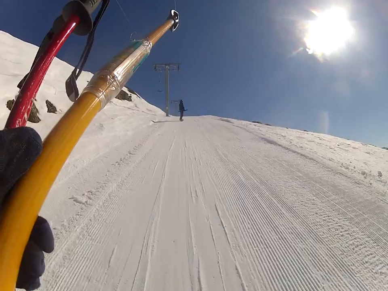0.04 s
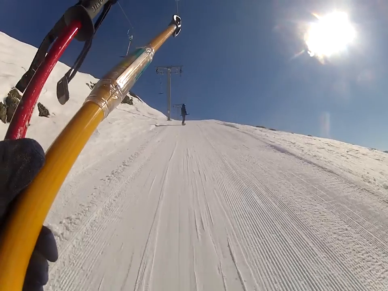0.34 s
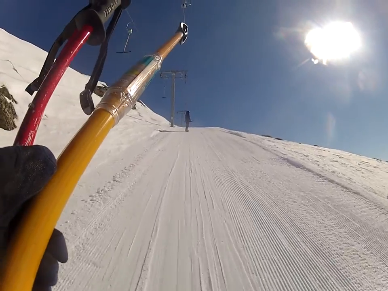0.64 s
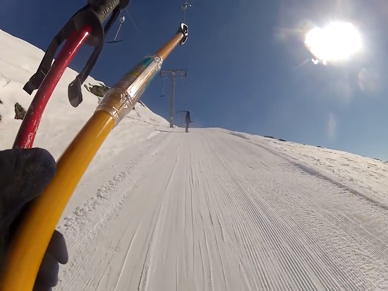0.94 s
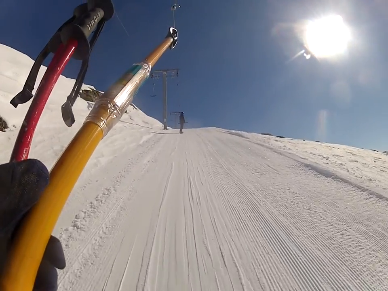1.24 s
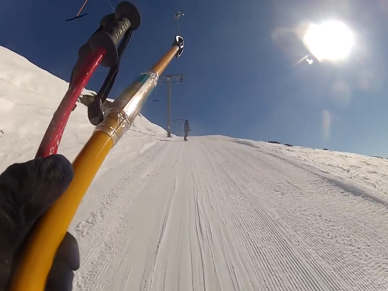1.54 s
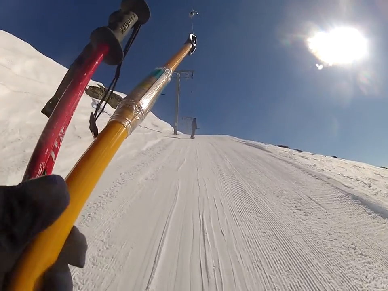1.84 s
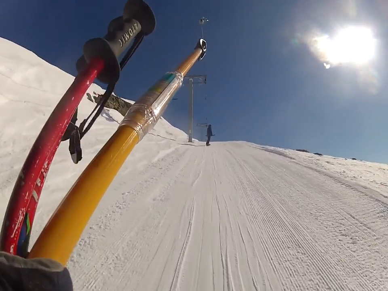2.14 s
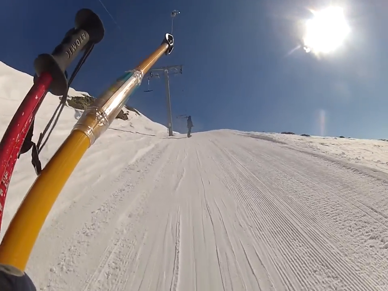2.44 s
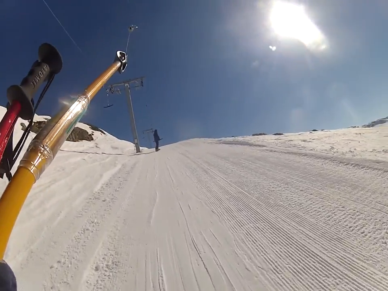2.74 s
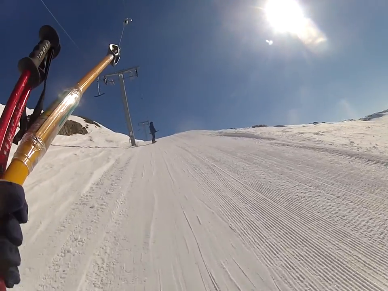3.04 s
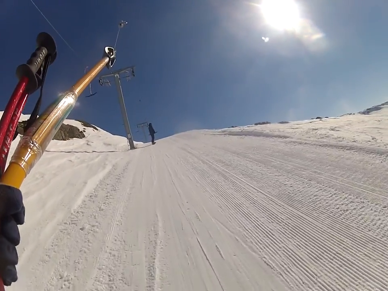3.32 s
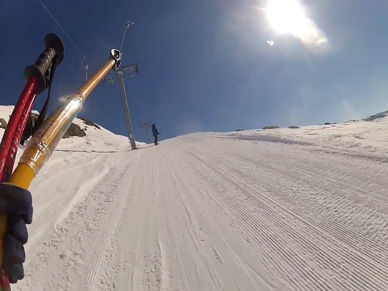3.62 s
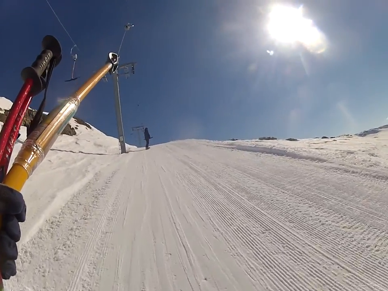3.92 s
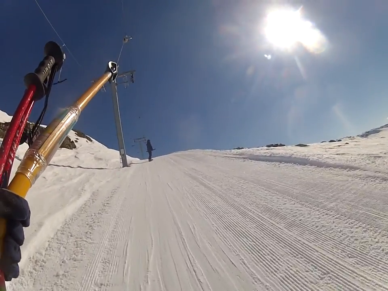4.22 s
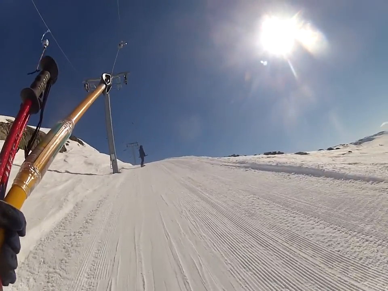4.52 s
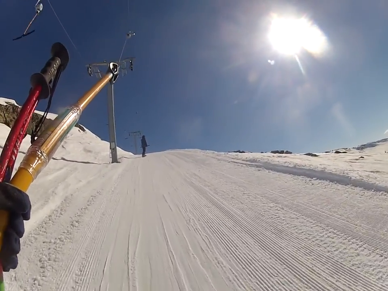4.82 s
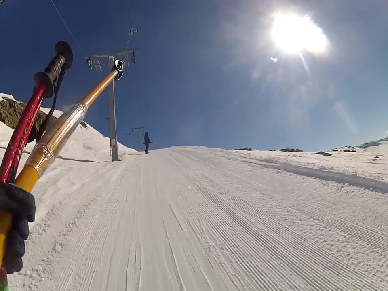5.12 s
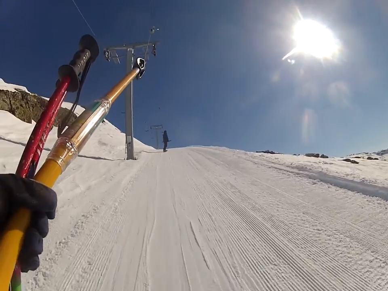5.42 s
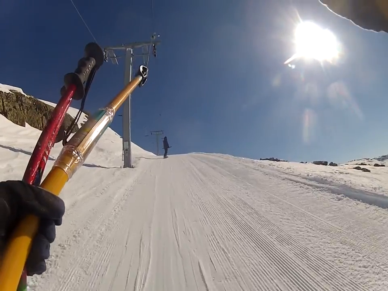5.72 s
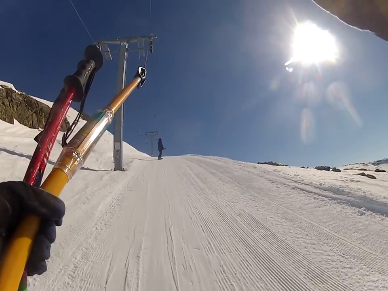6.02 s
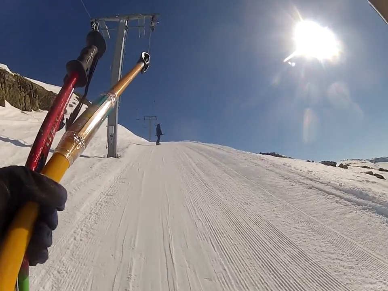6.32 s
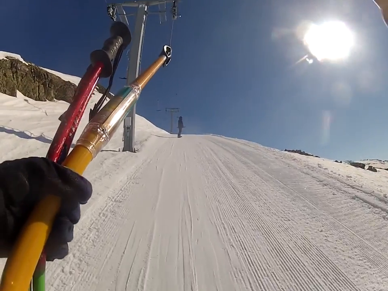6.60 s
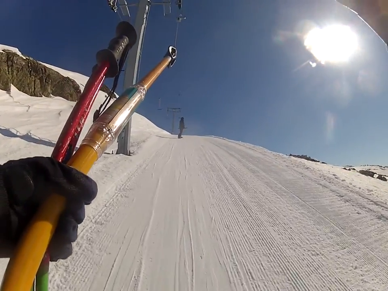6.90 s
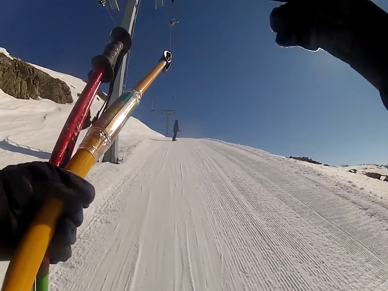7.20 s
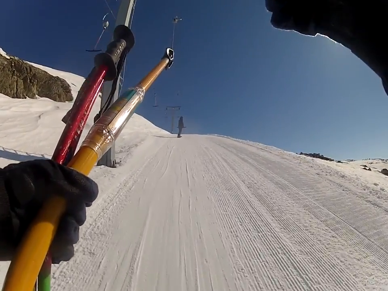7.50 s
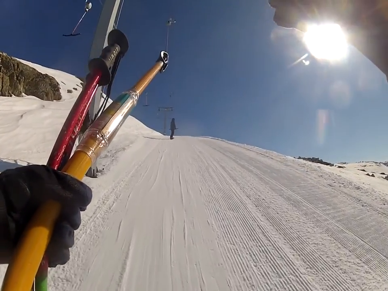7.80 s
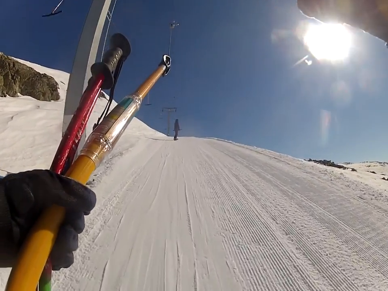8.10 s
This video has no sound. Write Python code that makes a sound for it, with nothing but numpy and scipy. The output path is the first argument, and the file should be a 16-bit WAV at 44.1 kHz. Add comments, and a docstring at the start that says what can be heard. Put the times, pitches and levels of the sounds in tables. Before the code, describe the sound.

Muffled, steady hiss of a board towed over snow, with rumbling wind and faint paired thumps, broken by a creak and a hard knock.

```python
"""A drag lift tows a snowboard up a groomed slope, heard from a camera in a closed case on the rider's
chest. All along, snow hisses under the board and rings in the case, and wind and ride rumble.
The mount creaks at once, then soft paired thuds like a heartbeat come through. From two seconds on,
a sleeve now and then scrapes the case. Just after five seconds the mount creaks and jolts, and something
hard knocks on the case once. The camera samples slowly and holds each sample, which adds a thin treble."""
import sys
import numpy as np
from scipy import signal
from scipy.fft import rfft, irfft, next_fast_len
from scipy.io import wavfile

SR = 44100
rng = np.random.default_rng(int(sys.argv[2]) if len(sys.argv) > 2 else 0)


def master(y):
    """Save y as 16-bit WAV."""
    cut = np.clip(np.atleast_2d(y).T, -1, 1)
    pcm = np.round(cut * 32767)  # scale
    wavfile.write(sys.argv[1], SR, pcm.astype(np.int16))


N = 359415
TIME = np.arange(N) / SR
HOLD_HZ = 8000  # samples the camera takes each second

# tone colour of a scrape or crack on the case: pitch_hz, level_db
CONTACT_SPECTRUM = [(300, -48), (600, -18), (900, -6.5), (1250, 0.5), (1550, 3.5), (1900, 6.5), (2300, 7),
                    (2750, -10.5), (3450, 5), (3900, -2)]


def from_db(db):
    """Turn decibels into a number to multiply by."""
    return 10 ** (np.asarray(db) / 20)


def rms_one(x):
    """Scale a sound so that its average strength (rms) is 1."""
    return x / np.sqrt(np.mean(x ** 2) + 1e-20)


def in_time(rows):
    """Join rows of (time_s, values...) with straight lines: one curve for each value column."""
    times, *columns = np.transpose(rows)
    return [np.interp(TIME, times, column) for column in columns]


def during(rows, fade_s=0.0036):
    """1 from the first row's time to the last, with a short fade to 0 on each side."""
    start, end = rows[0][0], rows[-1][0]
    return np.interp(TIME, [start - fade_s, start, end, end + fade_s], [0, 1, 1, 0])


def swells(rows):
    """Bell-shaped rises and falls from (middle_s, length_s, levels...): one gain curve for each level."""
    return sum(from_db(dbs)[:, None] * np.exp(-(2 * (TIME - middle) / length) ** 2)
               for middle, length, *dbs in rows)


def drift(rate_hz):
    """A smooth random wobble, about 1 in size; a higher rate wobbles faster."""
    step = 40  # samples between random points
    r = np.exp(-2 * np.pi * rate_hz * step / SR)
    slow = signal.lfilter([1], [1, -2 * r, r * r], rng.standard_normal(N // step + 2002))[2000:]
    return np.interp(np.arange(N) / step, np.arange(len(slow)), rms_one(slow))


def coloured(x, spectrum):
    """Give a sound a tone colour, with nothing above half the camera's sample rate; strength 1."""
    size = next_fast_len(N)
    hz, db = np.transpose(spectrum)
    bins_hz = np.maximum(np.fft.rfftfreq(size, 1 / SR), 1)
    gain = from_db(np.interp(np.log(bins_hz), np.log(hz), db)) * (bins_hz < HOLD_HZ / 2)
    return rms_one(irfft(rfft(x, size) * gain, size)[:N])


def resonate(x, modes):
    """Pick out a narrow band around each pitch and add them, every other one flipped; strength 1."""
    out = 0
    for k, (hz, width_hz, db) in enumerate(modes):
        r = np.exp(-np.pi * width_hz / SR)
        band = signal.lfilter([1, 0, -1], [1, -2 * r * np.cos(2 * np.pi * hz / SR), r * r], x)
        out = out + (-1) ** k * from_db(db) * (1 - r * r) / 2 * band
    return rms_one(out)


def ring(x, hz, fade_s):
    """Each click starts a pure tone that dies away by 60 dB in fade_s."""
    r = from_db(-60 / (fade_s * SR))
    angle = 2 * np.pi * hz / SR
    return signal.lfilter([0, np.sin(angle)], [1, -2 * r * np.cos(angle), r * r], x + 1e-18)


def clicks(rows):
    """One click for each (start_s, level_db)."""
    out = np.zeros(N)
    for start_s, db in rows:
        out[round(start_s * SR)] += from_db(db)
    return out


def grains(per_s, spread_db):
    """Tiny slips at random moments and of uneven size."""
    sizes = from_db(spread_db * np.minimum(rng.exponential(1, N), 4))
    return (rng.random(N) < per_s / SR) * sizes * rng.standard_normal(N)


def thuds(rows, hz, fade_s, soft_hz):
    """Soft pushes (clicks dulled above soft_hz) rock the camera on its mount."""
    push = signal.sosfilt(signal.butter(2, soft_hz, fs=SR, output="sos"), clicks(rows))
    return ring(push, hz, fade_s)


def board(hiss_gain, ring_gain, crunch_gain):
    """Snow crystals crush under the board, and the case rings along at its own pitches."""
    # tone colour of crushing snow: pitch_hz, level_db
    snow_spectrum = [(200, 0), (450, -3), (850, -9.5), (1200, -5.5), (1600, -6), (2500, -7.5), (3000, -8.5),
                     (3900, -2)]
    # where the case rings, for hiss, singing and crunch: pitch_hz, width_hz, level_db
    hiss_modes = [(1797, 215, 0), (2610, 230, -2), (3230, 280, 0.5), (3473, 230, -4.5)]
    ring_modes = [(1921, 106, 1), (2145, 164, -1.5), (3540, 190, -13.5)]
    crunch_modes = [(690, 69, -10.5), (1152, 101, -0.5), (1263, 108, 0), (1460, 200, -7.5)]
    crush = coloured(grains(per_s=9000, spread_db=2.0), snow_spectrum)
    through_case = resonate(grains(per_s=7000, spread_db=3.0), hiss_modes)
    hiss = hiss_gain * from_db(1) * (crush + through_case)
    sing = ring_gain * from_db(0.67) * resonate(grains(per_s=5000, spread_db=-0.5), ring_modes)
    crunch = crunch_gain * from_db(-0.5) * resonate(grains(per_s=3000, spread_db=3.5), crunch_modes)
    uneven_db = 0.92 * drift(25)
    return (hiss + sing + crunch) * from_db(uneven_db)


def rumble(lumps_db):
    """Wind and shaking make a low, lumpy noise."""
    # tone colour of the rumble: pitch_hz, level_db
    spectrum = [(12, -17), (28, 12), (55, 6), (100, 3.5), (180, 0), (260, -6.5), (400, -14.5), (600, -16.5),
                (1200, -20.5)]
    return from_db(lumps_db * drift(28)) * coloured(rng.standard_normal(N), spectrum)


def ride(pulsing):
    """The harder the board presses, the louder the snow; rough and squeaky patches and wind add to it."""
    # how hard the board presses, given as loudness of hiss: time_s, level_db
    glide = [(.1, -61), (.35, -61), (.5, -69), (.78, -74), (1.2, -66.5), (1.7, -69.5), (2.02, -64.5),
             (2.22, -69), (2.65, -65), (3.3, -70.5), (3.95, -64.5), (4.35, -70.5), (5.1, -65.5),
             (5.65, -69.5), (6.2, -72.5), (6.48, -65), (6.9, -66), (8.13, -69)]
    # steady rumble of wind and ride: time_s, level_db
    wind = [(0, -60), (4.3, -61), (5.8, -57), (7.2, -60)]
    # rough snow that crunches and shakes the ride: middle_s, length_s, crunch_db, rumble_db
    rough_snow = [(.42, 0.048, -59.5, -55), (2.0, .14, -61.5, -60), (2.53, 0.065, -60.5, -53),
                  (2.65, 0.19, -57, -51.5), (2.97, 0.23, -65.5, -61.5), (3.45, 0.51, -68, -75),
                  (3.92, 0.075, -62.5, -77), (4.76, 0.21, -66, -55), (5.08, 0.21, -67.5, -63),
                  (5.73, 0.29, -63.5, -57), (6.3, 0.23, -64.5, -55.5), (6.53, 0.072, -62, -62),
                  (6.72, 0.056, -58.5, -63)]
    # squeaky snow that makes the case sing: middle_s, length_s, level_db
    squeaky_snow = [(.13, 0.19, -52), (.28, 0.11, -49), (2.32, .07, -60), (3.55, 0.31, -65),
                    (6.0, 0.13, -58.5), (7.17, 0.063, -60), (7.72, 0.15, -63), (7.95, 0.12, -62)]
    usual_hiss_db, usual_ring_db, usual_crunch_db = -69, -64, -70.5
    wander_db, wander_hz = 0.9, 7.4  # the snow changes under the board
    hiss_db, = in_time(glide)
    wind_db, = in_time(wind)
    rough, shaking = swells(rough_snow)
    squeak, = swells(squeaky_snow)
    load_db = hiss_db - usual_hiss_db  # ring and crunch follow only part of this swing
    ring_db = usual_ring_db + 0.47 * load_db + wander_db * drift(wander_hz)
    crunch_db = usual_crunch_db + 0.4 * load_db + wander_db * drift(wander_hz)
    ring_gain = np.hypot(from_db(ring_db), squeak)  # hypot adds the two powers
    crunch_gain = np.hypot(from_db(crunch_db), rough)
    rumble_gain = np.hypot(from_db(wind_db), shaking)
    return board(from_db(hiss_db), ring_gain, crunch_gain) * pulsing + rumble_gain * rumble(lumps_db=1.2)


def camera_hum():
    """A faint electrical hum, the same in left and right."""
    # tones of the hum: pitch_hz, level_db
    tones = [(192, -80.5), (240, -79.5), (288, -80), (384, -83), (432, -86.5), (3744, -83.5)]
    return sum(from_db(db) * np.sqrt(2) * np.sin(2 * np.pi * (hz * TIME + rng.random()))
               for hz, db in tones)


def background_hiss():
    """A very faint, low background hiss, different in left and right."""
    # tone colour of the hiss: pitch_hz, level_db
    spectrum = [(60, 2.0), (450, -8), (900, -14.5), (2000, -25.0), (3900, -24)]
    return from_db(-79.5) * np.array([coloured(rng.standard_normal(N), spectrum) for _ in range(2)])


def creaks():
    """The mount sticks and slips. Gives its low tone, and the pulsing each slip puts on the snow sound."""
    # one list for each creak: time_s, slips_per_s, level_db
    creak_curves = [
        [(.083, 52, -36.5), (.175, 55, -31.5), (.21, 60.6, -29), (.297, 63.5, -25), (.325, 57, -36),
         (.37, 29.5, -32), (.42, 30, -53)],
        [(1.99, 135, -56), (2.045, 123, -45), (2.08, 101, -44), (2.15, 68, -59)],
        [(5.213, 104, -28.5), (5.23, 100, -25), (5.25, 118, -31), (5.29, 53, -49)],
        [(5.465, 165, -44), (5.525, 57, -44), (5.565, 25, -52)],
    ]
    tone, pulsing = 0, 1
    for rows in creak_curves:
        slips_per_s, db = in_time(rows)
        unsteady_hz = slips_per_s * (1 + 0.016 * drift(30))
        phase = 2 * np.pi * np.cumsum(unsteady_hz * (TIME > rows[0][0])) / SR
        overtones = sum(from_db(-14.5 - 12 * k) * np.sin((k + 2) * phase) for k in range(3))
        gate = during(rows)
        tone = tone + gate * from_db(db - 1.5) * (np.sin(phase) + overtones)
        pulsing = pulsing * from_db(gate * (2.2 * np.sin(phase) - 0.5))
    return tone, pulsing


def heartbeat():
    """Pairs of soft, deep thuds rock the camera like a heartbeat."""
    # beats, each with a wait before its second thud: start_s, wait_s, level_db
    beats = [(.454, 0.26, -46.5), (1.119, 0.28, -45.5), (1.782, 0.26, -46), (2.41, 0.31, -45.5),
             (3.053, 0.26, -48), (3.689, .263, -46.5), (4.316, .272, -45), (4.952, 0.24, -57),
             (7.864, 0.28, -47)]
    pushes = [(start + lag, db) for start, wait, db in beats for lag in (0, wait) if start + lag < TIME[-1]]
    return from_db(2.5) * thuds(pushes, hz=40.5, fade_s=0.24, soft_hz=109)


def sleeve():
    """Each rub of cloth swells and fades, scraping the case and shaking it."""
    # rubs of the sleeve: middle_s, length_s, scrape_db, rumble_db
    rubs = [(2.054, 0.052, -58.5, -70), (2.672, 0.039, -55.5, -60), (5.262, 0.054, -38.5, -32.5),
            (5.33, 0.099, -51.5, -45.5), (5.402, 0.087, -46.5, -50.5), (5.516, 0.024, -52, -68),
            (6.883, 0.021, -48.5, -70)]
    scrape_gain, shaking = swells(rubs)
    scrape = coloured(grains(per_s=8600, spread_db=-1.0), CONTACT_SPECTRUM)
    return scrape_gain * scrape + shaking * rumble(lumps_db=3.0)


def jolts():
    """The mount jolts, giving short, low bumps."""
    # pushes on the mount: start_s, level_db
    pushes = [(5.2445, -28), (5.346, -32), (5.403, -35), (5.518, -36), (6.293, -36), (6.41, -41),
              (6.994, -35)]
    return from_db(7.5) * thuds(pushes, hz=91.0, fade_s=0.025, soft_hz=260)


def knock(crack_fade_s=0.025):
    """Something hard hits the case: a short crack of noise, and the case rings."""
    # a light touch, then the knock: start_s, level_db
    contacts = [(5.3385, -30), (5.3469, 2)]
    # tones of the knocked case: pitch_hz, level_db, fade_s
    modes = [(597, -38, 0.1), (1223, -29.5, 0.048), (1446, -18, 0.016), (1804, -12, 0.013),
             (2350, -18.5, 0.019), (2890, -17.5, .012), (3590, -17.5, 0.01)]
    touches = clicks(contacts)
    ringing = sum((-1) ** k * from_db(db) * ring(touches, hz, fade_s)
                  for k, (hz, db, fade_s) in enumerate(modes))
    dying = signal.lfilter([1], [1, -from_db(-60 / (crack_fade_s * SR))], touches + 1e-18)
    crack = dying * coloured(rng.standard_normal(N), CONTACT_SPECTRUM)
    return from_db(-2.5) * ringing + from_db(-23.5) * crack


def scene():
    """The sounds at one microphone inside the case, over a faint hum and hiss."""
    creak, pulsing = creaks()
    hit = knock()
    return ride(pulsing) + creak + heartbeat() + sleeve() + jolts() + hit + camera_hum() + background_hiss()


def record(dry):
    """The camera holds each slow sample, which mirrors the sound into the treble; the very top is cut."""
    repeats, silent_until_s, cutoff_hz = 4, 0.086, 15200
    fast_hz = HOLD_HZ * repeats
    fast = signal.resample_poly(dry, fast_hz, SR, axis=1)
    band_limit = signal.firwin(129, 3830, fs=fast_hz)  # keeps what lies below 3830 Hz
    slow = signal.fftconvolve(fast, band_limit[None], "same", axes=1)[:, ::repeats]
    stair_steps = np.repeat(slow, repeats, axis=1)
    held = signal.resample_poly(stair_steps, SR, fast_hz, axis=1)[:, :N]
    top_cut = signal.firwin(201, cutoff_hz, fs=SR)
    return signal.fftconvolve(held * (TIME > silent_until_s), top_cut[None], "same", axes=1)


dry = scene()
out = record(dry)
master(out)
```